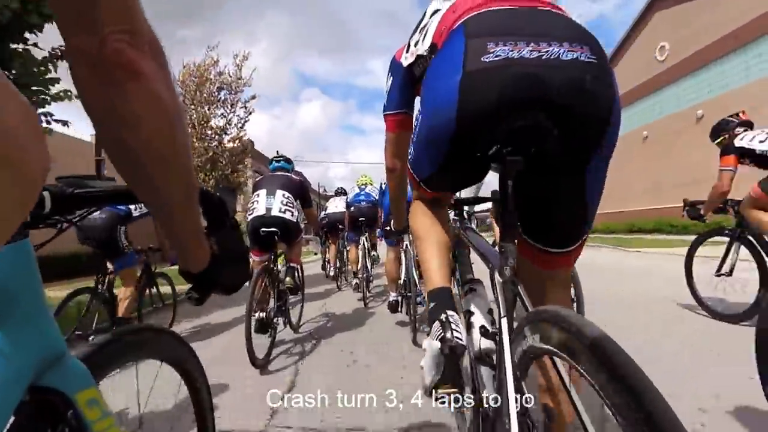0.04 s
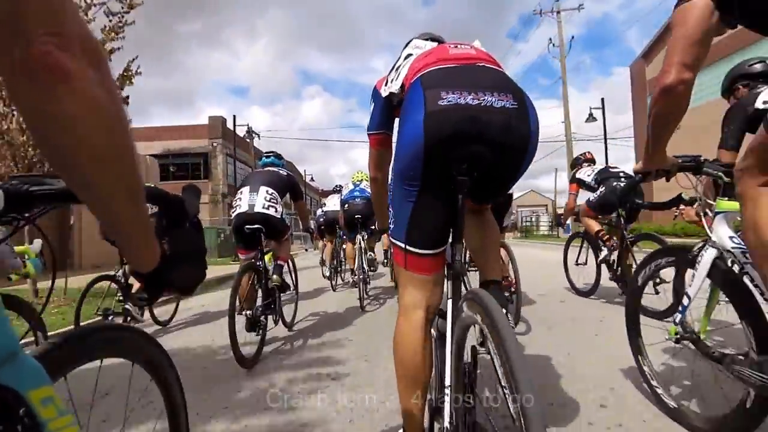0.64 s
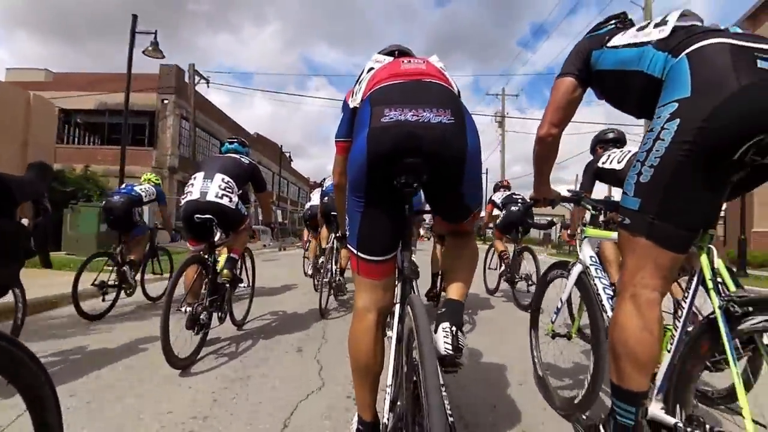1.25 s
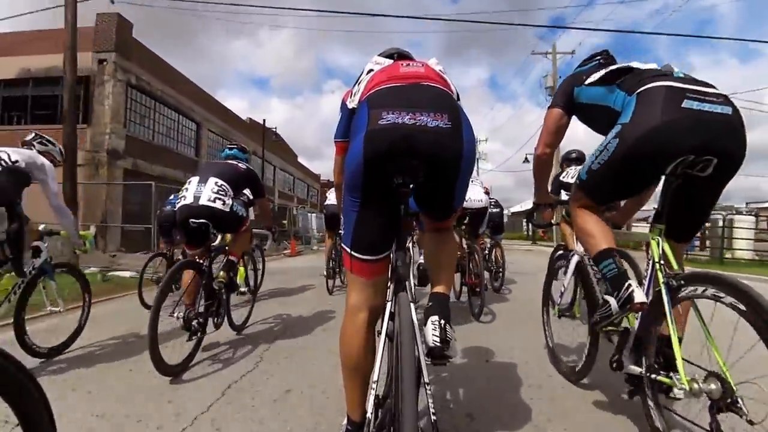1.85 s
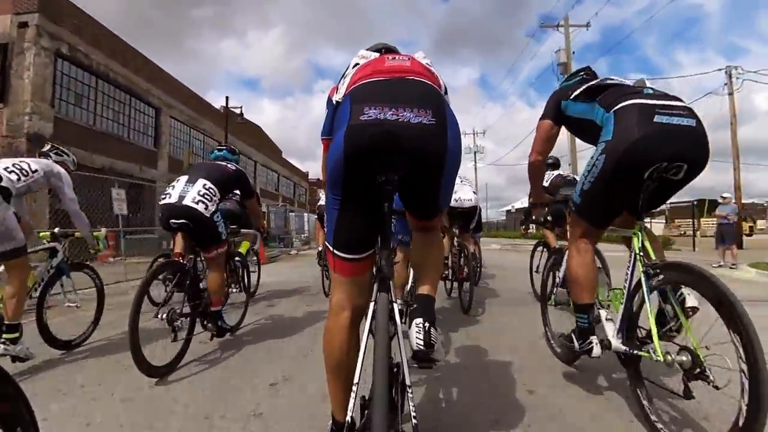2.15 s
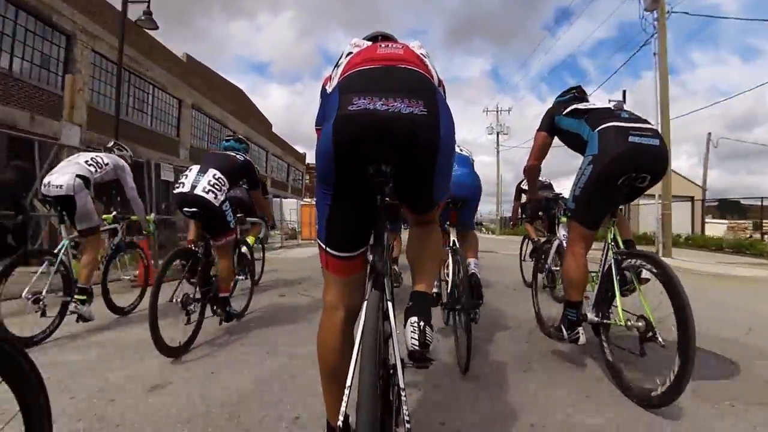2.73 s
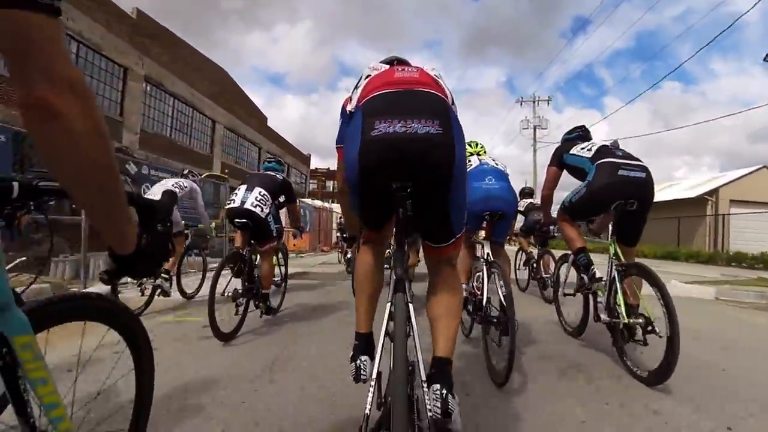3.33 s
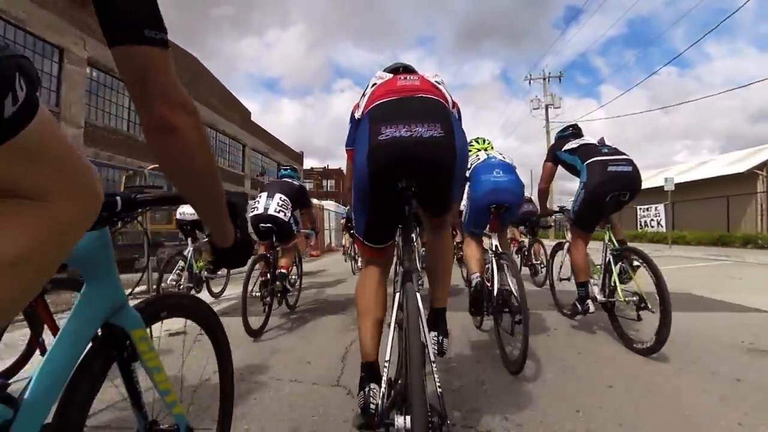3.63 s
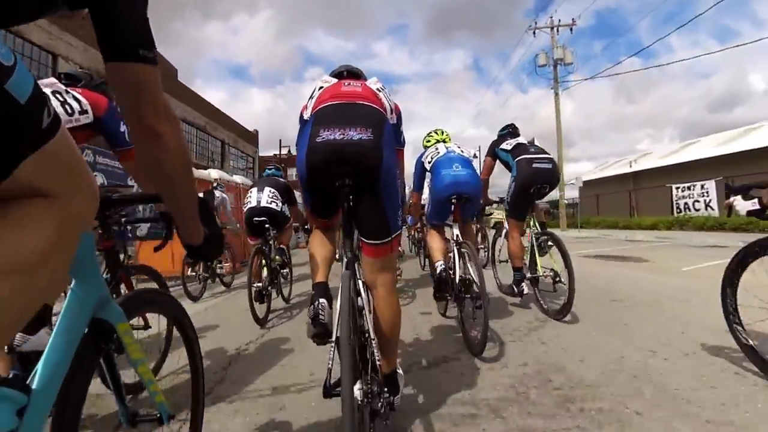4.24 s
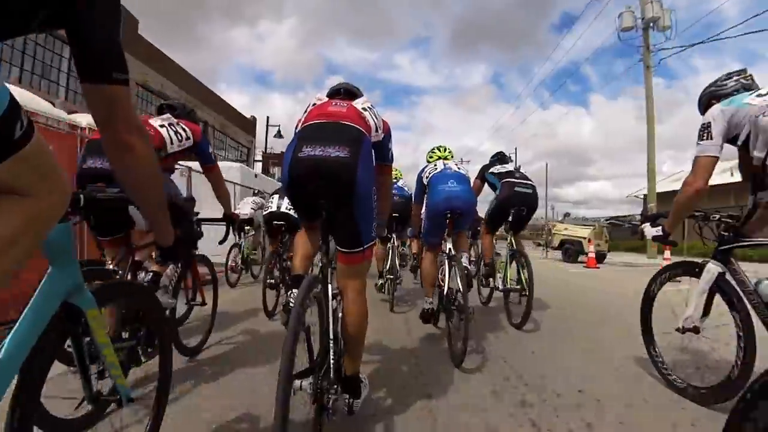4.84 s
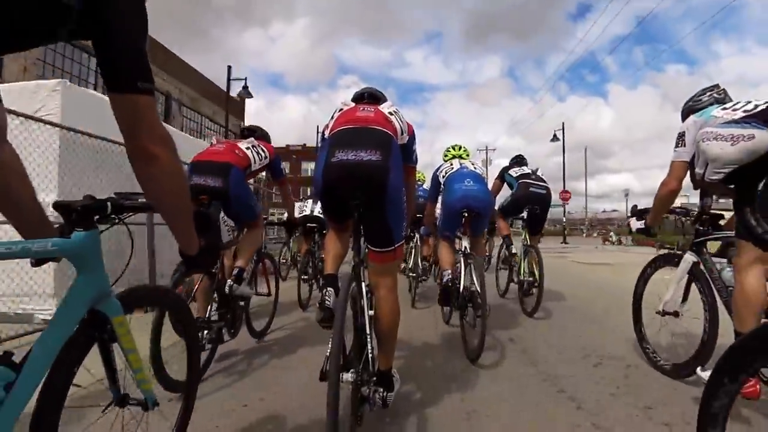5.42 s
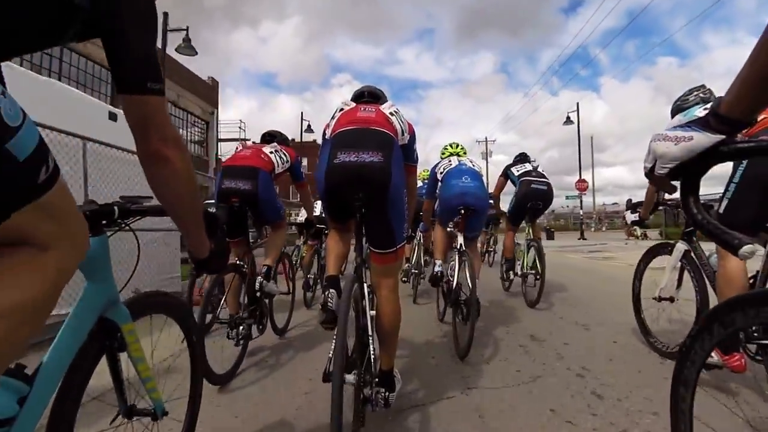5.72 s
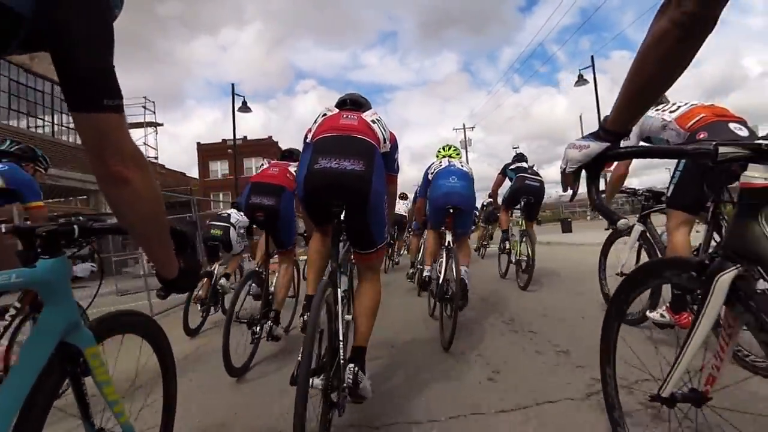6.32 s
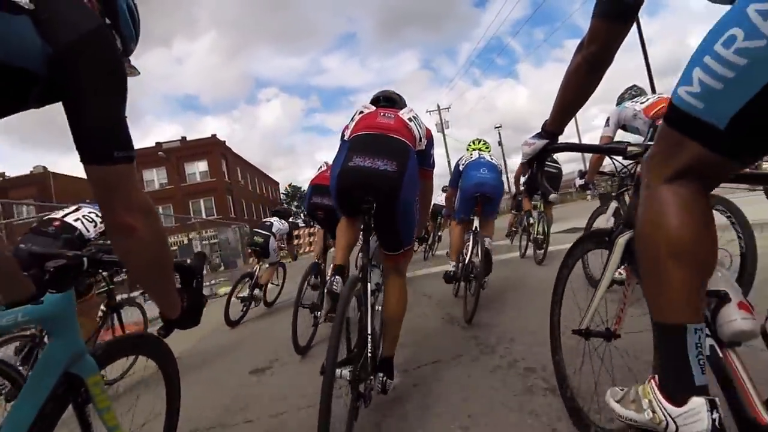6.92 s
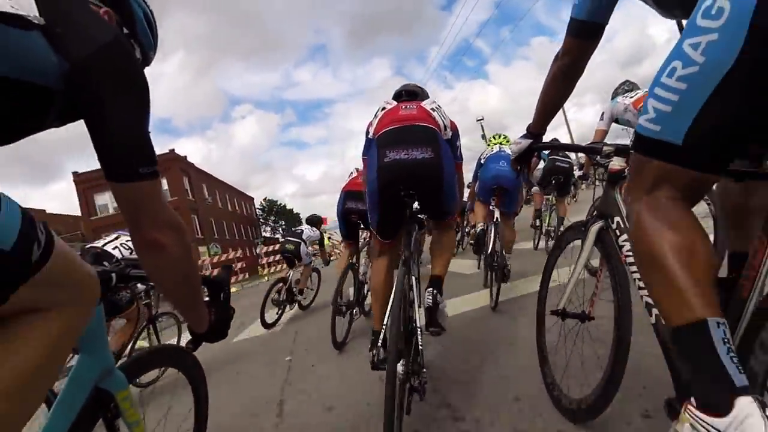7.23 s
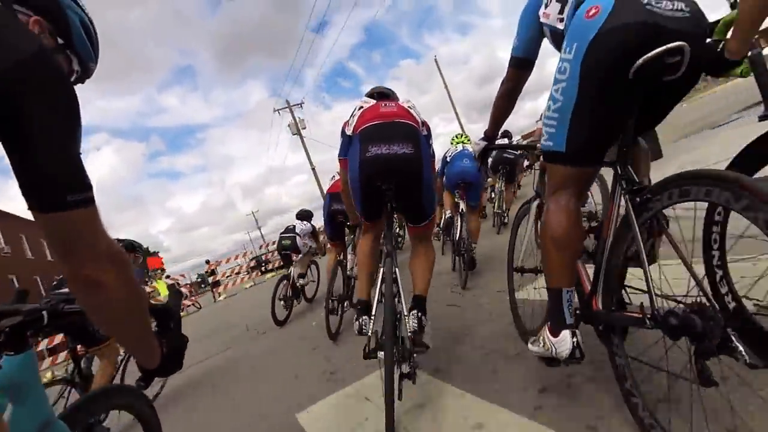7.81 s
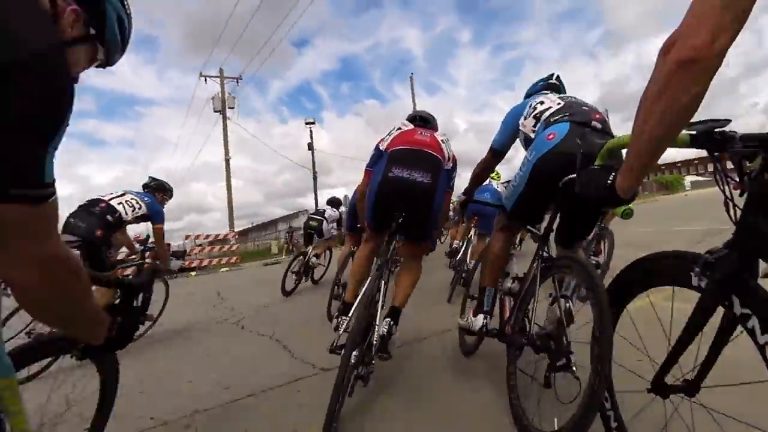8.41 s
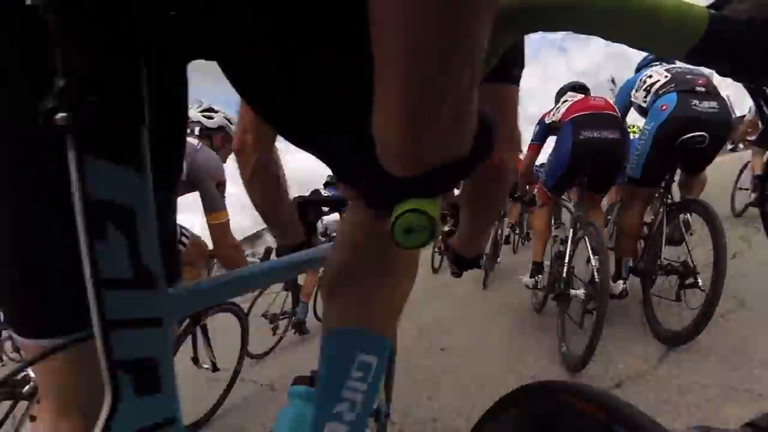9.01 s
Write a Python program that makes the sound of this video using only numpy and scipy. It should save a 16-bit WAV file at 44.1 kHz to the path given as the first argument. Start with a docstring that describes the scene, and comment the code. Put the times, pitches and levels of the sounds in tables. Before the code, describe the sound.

Racing bicycle chains whirr and gears tick under rushing wind and clattering mount knocks, until brakes briefly squeal and scrub.

```python
"""Riding in a bicycle race

A camera rides on a racing bicycle inside a pack. Wind and rough asphalt drum on its housing and mount,
while chains whirr, gears tick and loose parts rattle. Cracks in the road make the mount knock,
overloading the microphone. Near the end, in a corner, brakes squeal and scrub on the rims."""
import sys
import numpy as np
from scipy import signal
from scipy.fft import rfft, irfft, next_fast_len
from scipy.io import wavfile
from scipy.ndimage import uniform_filter1d, map_coordinates

SR = 44100
rng = np.random.default_rng(int(sys.argv[2]) if len(sys.argv) > 2 else 0)


def unload_audio(sound):
    """Save the sound as a 16-bit wav file, at the path given as the first command line argument."""
    columns = np.transpose(np.atleast_2d(sound))
    # keep every value between -1 and 1, then stretch to whole-number steps
    steps = np.round(np.clip(columns, -1, 1) * 32767)
    wavfile.write(sys.argv[1], SR, steps.astype(np.int16))


N = 399546
TIME = np.arange(N) / SR

# whirr of the whole pack's chains: t/s, level/dB
PACK_LEVELS = [(0, -53), (3.5, -45), (3.8, -50.5), (5.0, -49.5), (6.0, -47.5), (7.5, -53), (8.5, -50),
               (9.06, -48)]
# spells when a rider close by coasts and the freewheel buzzes louder: t/s, length/s, level/dB
COASTING_SPELLS = [(0, 1.31, -39), (1.655, 1.1, -40.5), (3.084, 0.11, -39), (3.257, 0.036, -37.5),
                   (6.155, 0.55, -40.5), (8.904, 0.2, -41.5)]
# resonances (favoured pitches) of chains and sprockets: f/Hz, width/Hz, level/dB
CHAIN_MODES = [(2260, 220, -6), (2658, 296, 9.5), (3264, 340, -3), (3880, 520, -11.5), (4290, 310, -14),
               (4590, 320, -11), (5450, 290, -22.5), (7270, 330, -32), (8040, 540, -36)]
# a chain brushes its guide: t/s
RUB_TIMES = [1.9, 2.1, 2.34]
# gear and spoke ticks close by: t/s, level/dB
CLOSE_TICKS = [(1.373, -16), (2.399, -15.5), (4.404, -17), (4.526, -9), (4.665, -23), (5.056, -27),
               (5.867, -25), (5.952, -25), (6.08, -20.5), (6.131, -21.5), (6.732, -27), (6.843, -23),
               (7.094, -25.5), (7.261, -15), (8.009, -18), (8.901, -16), (8.934, -18)]
# tone colour of the ticks: f/Hz, level/dB
TICK_SPECTRUM = [(500, -10), (1500, 5), (3800, 5), (5000, -16), (6500, -25.5), (9000, -42.5), (16000, -58)]
# strength of the wind, rising in the corner: t/s, level/dB
WIND_LEVELS = [(0, -32), (2.6, -33), (3.9, -35), (4.5, -32), (5.7, -34), (7.6, -34), (8.5, -32),
               (8.73, -26.5), (9.06, -29.5)]
# tone colour of the wind: f/Hz, level/dB
WIND_SPECTRUM = [(20, -28), (70, -3), (250, 2.5), (550, 3.5), (800, 2), (1150, -3.5), (1500, -6),
                 (2000, -15.5), (3700, -19), (4600, -33.5), (5100, -37), (5600, -37), (6500, -49),
                 (9000, -63.5), (16000, -74.5)]
# flurries of taps from loose parts: t/s, level/dB
TAP_FLURRIES = [(0.432, -25.5), (1.23, -16.5), (1.655, -20.5), (2.926, -17), (3.385, -16), (3.615, -16),
                (4.164, -21), (4.397, -15), (4.741, -15.5), (5.311, -19.5), (5.371, -25.5), (5.69, -22),
                (5.805, -21), (5.934, -23), (6.071, -23.5), (6.86, -26.5), (7.98, -22.5), (8.169, -15.5),
                (8.244, -22), (8.308, -18), (8.87, -19.5)]
# tone colour of the taps: f/Hz, level/dB
TAP_SPECTRUM = [(100, -9.5), (400, 20), (800, 16), (1800, -6), (3900, -4.5), (5200, -29), (9000, -47),
                (16000, -70.5)]
# light metal rattles on the bikes: t/s, level/dB
STEEL_CLINKS = [(3.058, -22), (7.99, -16), (7.9938, -23), (8.3443, -20), (8.7793, -12.5), (8.962, -23),
                (9.039, -21)]
# tones of the clinking steel: f/Hz, level/dB, t60/s (the time to fade by 60 dB)
STEEL_MODES = [(2250, -10.5, 0.025), (2725, 0.5, 0.026), (3280, -3, 0.015), (3840, -13, 0.017)]
# brake pads singing on a rim: t/s, length/s, level/dB
BRAKE_SQUEALS = [(8.211, 0.058, -36.5), (8.288, 0.071, -39), (8.401, 0.026, -35), (8.45, 0.036, -39.5),
                 (8.902, .04, -38)]
# tone colour of the rubbing pads: f/Hz, level/dB
PAD_SPECTRUM = [(300, 0), (800, 13.5), (1700, -5), (2500, 3), (3400, -7), (4700, -13), (5400, -31),
                (7800, -24), (9000, -51), (15000, -71)]
# resonances of the scrubbed rim: f/Hz, width/Hz, level/dB
RIM_MODES = [(2390, 140, 7), (2690, 86, 4.5), (3260, 100, 4), (3720, 100, 0), (4100, 140, -3),
             (4650, 150, -9)]
# resonances of the mount: f/Hz, width/Hz, level/dB
MOUNT_MODES = [(56.3, 7.1, -18.5), (130.6, 12, -2.5), (180.8, 39.5, -9)]
# resonances of the housing: f/Hz, width/Hz, level/dB
HOUSING_MODES = [(308.5, 33, -2), (385.9, 30.2, 1), (437.3, 44.7, -0.7)]
# bumps in the road: t/s, change in the mount's boom/dB, change in the housing's hollow sound/dB
ROAD_BUMPS = [(0.43, 2, 4), (0.95, 6.5, 2.5), (1.14, -5.5, 11.5), (1.231, 9, 12.5), (2.589, -6, 7),
              (2.68, 3.5, 8), (2.95, 4, -5), (3.41, -8.5, 4), (3.631, 13, 4), (4.67, 7, 5), (5.939, 6.5, 9),
              (6.08, 5.5, 0), (6.51, 7, 3), (6.87, -3.5, 8.5), (7.97, 1, 5.5), (8.56, -5, 5),
              (8.61, 2, 9.5), (8.72, -6, 8.5), (8.766, 11, 2)]
# the housing hums on after a jolt: t/s, f/Hz, level/dB, t60/s
HOUSING_HUMS = [(2.574, 357, -5, 0.1), (2.611, 390, -9.5, 0.16), (2.681, 373, -9, 0.096),
                (3.397, 417, 7, 0.05), (3.412, 434.4, -10, 0.3)]
# knocks of the mount: t/s, thump level/dB, thump rise/s, crack level/dB, clack level/dB, clack f/Hz
MOUNT_KNOCKS = [(0.5839, 1, 0.00036, -11, -12, 1140), (0.6065, -4, 0.000036, -28, -4, 790),
                (0.612, -13, 0.0004, -30, -0.5, 540), (0.6752, -4, 0.0004, -14, -9, 720),
                (1.145, 0, 0.00044, -12.5, -15.5, 480), (1.2491, -2, 0.000034, -23, -7, 666),
                (1.5776, -21, 0.0004, -19, -14, 1330), (1.682, -8.5, 0.00017, -22, -19, 800),
                (1.781, -5, 7e-05, -23, -14.5, 600), (1.7917, -7.5, 7e-05, -23.5, -22, 765),
                (2.0006, -0.5, 0.000026, -19.5, -2.5, 900), (2.013, -6, 9e-05, -13.5, -22, 510),
                (2.0333, -9, 0.0001, -41, -7, 700), (2.4394, -4, 0.00013, -15, -10, 880),
                (2.6783, -3, 7e-05, -11.5, -12, 950), (2.7095, -4, 0.0001, -30, -1, 690),
                (2.7986, -9, 0.0001, -20, -3.5, 846), (2.8029, -1.5, 0.0000086, -14, -15, 1070),
                (2.8223, -2, 5e-05, -38, -11, 480), (2.8275, -1.5, 3e-05, -22.5, -14, 980),
                (2.8364, -4, 0.000035, -28, -10, 620), (2.8478, -2, 0.000021, -18.5, -14.5, 990),
                (2.8607, -5, 0.000049, -38, 0, 480), (2.875, -10, 9e-05, -39, -9, 584),
                (2.881, -3.5, 0.000067, -38, -3, 550), (2.8909, -5, 0.000034, -21.5, -12, 740),
                (2.899, -9.5, 7e-05, -9, -8, 515), (2.9576, -7, 0.000085, -45, -7, 520),
                (3.058, -12, 0.0001, -27, -13, 835), (3.393, -15, 8e-05, -23.5, -12, 477),
                (3.402, -7.5, 0.000027, -37, -2.5, 480), (3.6264, -8.5, 0.0002, -25, -15, 790),
                (3.6409, -4.5, 0.000039, -23.5, -14, 870), (3.9158, -17, 5e-05, -37, -11.5, 480),
                (4.1473, 1, 0.0001, -29.5, -2, 750), (4.1535, 2, 0.00041, -21, -7, 960),
                (4.2042, -0.5, 0.00011, -24, -12, 820), (4.2919, 0.5, 4e-05, -32, -10, 720),
                (4.3012, 0, 0.000064, -31.5, -11, 604), (4.3068, -7, 5e-05, -26, -11, 554),
                (4.3136, -12, 5e-05, -17, -15, 890), (4.318, -5, 0.00006, -33, -11, 650),
                (4.3244, -2, 3e-05, -27, -16, 694), (4.3283, -3, 1e-05, -16.5, -11, 1080),
                (4.3483, -1, 1e-05, -15.5, -16, 1050), (4.359, -9, 0.00011, -39, -8.5, 600),
                (4.3669, -2.5, 9e-05, -27.5, -8, 680), (4.498, -4, 0.00059, -22.5, -11.5, 1300),
                (4.515, 2, 0.00011, -19, -18, 510), (4.5859, -3.5, 0.000092, -17.5, 1, 750),
                (4.7621, -3.5, 0.000092, -28, -3.5, 716), (5.282, -5, 0.0004, -24.5, -10, 700),
                (5.3105, -6, 0.00034, -20.5, -17, 574), (5.319, -10, 0.0001, -41, -3, 510),
                (5.3306, -12.5, 0.00028, -27, -21, 740), (5.5622, -5.5, 0.000022, -23.5, -17, 794),
                (5.5706, -1, 5e-05, -32.5, -2, 500), (5.5741, -2.5, 0.000042, -33, -8.5, 580),
                (5.5796, -3.5, 1e-05, -18.5, -14, 960), (5.589, -2, 0.0001, -23, -15, 890),
                (5.6002, -1.5, 0.000083, -27, -8.5, 733), (5.6654, -5, 0.00037, -12.5, -12, 620),
                (5.704, -13, 0.0001, -38, -3.5, 480), (5.7185, -15, 0.0001, -46, -5, 483),
                (6.3562, 0.5, 0.000015, -20, -1.5, 915), (6.3616, -8.5, 0.000036, -26.5, -3.5, 665),
                (7.2122, -0.5, 5e-05, -13.5, -3, 990), (7.3101, -17, 0.0002, -17, -27, 1010),
                (7.3217, -14, 0.0004, -17.5, -14, 880), (7.3448, -8, 0.00012, -30, -4.5, 670),
                (7.3734, -24, 0.0001, -17.5, -10, 800), (7.4237, -5, 0.00046, -14.5, -19, 800),
                (7.4728, -15, 0.00018, -19, -14.5, 690), (7.6486, -1, 5e-05, -10, -2.5, 870),
                (7.6645, -7.5, 0.0001, -44, -1.5, 580), (7.6795, -6.5, 0.000048, -34, -3.5, 530),
                (7.683, -7, 0.000046, -32.5, -3, 540), (7.692, -0.5, 0.000075, -22.5, -12, 800),
                (7.701, -2.5, 0.000093, -27, -13, 780), (7.8145, -1.5, 0.000033, -16.5, -26, 890),
                (8.126, -5.5, 0.00024, -27, 0, 785), (8.1388, -1.5, 3e-05, -31.5, -8, 720),
                (8.1469, -2, 4e-05, -37.5, -10, 610), (8.156, 1, 4e-05, -26, -11, 690),
                (8.1839, -2, 0.000024, -23.5, -9, 750), (8.1934, -2.5, 5e-05, -26, -14, 730),
                (8.3019, -6, 0.0004, -21.5, -7, 630), (8.3477, 0, 0.00033, -17, -12, 830),
                (8.3591, -4, 3e-05, -23.5, -16, 810), (8.3673, -0.5, 0.000078, -44, -6.5, 480),
                (8.3737, -0.5, 0.00012, -29.5, -20, 580), (8.3838, -5, 0.000059, -29, -6.5, 610),
                (8.4223, -3.5, 0.000065, -34, -2, 570), (8.4288, 1, 0.00014, -33, -18.5, 610),
                (8.6075, -9, 0.0003, -31.5, -16, 720), (8.7576, -5, 0.000036, -36, -11, 690),
                (8.7627, -1.5, 0.00024, -34, -13, 810), (8.766, -9, 0.000033, -35, -4.5, 682),
                (8.7911, -3, 4e-05, -34, -4, 590), (8.7981, -1.5, 0.000045, -33, -12, 540),
                (8.8034, -3, 0.0001, -21.5, -7, 820), (8.8067, -1, 0.00045, -9.5, -7, 1210),
                (8.847, -1.5, 0.000048, -38, -19, 1290), (8.963, -6, 0.00022, -22.5, -14, 590),
                (9.012, -9, 0.00045, -24, -12, 1030), (9.0388, -10, 0.0004, -16.5, -11, 900)]
# tones of the plastic shell, rung by every knock: f/Hz, level/dB, t60/s
SHELL_MODES = [(623, -3, 0.0076), (889, 1.5, 0.0083), (1300, 7, 0.012), (1680, -3.5, 0.0079),
               (2400, 2.5, 0.0076), (2920, 4, 0.0098), (3610, -1, 0.0075), (4700, -8.5, 0.0081)]
# how the microphone dulls a thump: f/Hz, level/dB
THUMP_SPECTRUM = [(3500, 0.5), (5500, -7), (12000, -17), (18000, -28)]
# tone colour of a knock's sharp crack: f/Hz, level/dB
CRACK_SPECTRUM = [(200, -9.5), (700, 10.5), (1300, 4.5), (2200, 8), (3700, 7), (5000, -19), (7000, -31),
                  (10000, -40), (18000, -48)]


def amp(db):
    """Turn decibels into a gain."""
    return 10 ** (np.asarray(db) / 20)


def unit(x):
    """Scale x to an average strength (rms) of 1."""
    return x / np.sqrt(np.mean(x ** 2) + 1e-20)


def curve(points):
    """Join (time, value) points with straight lines."""
    return np.interp(TIME, *np.transpose(points))


def gate(start, attack, hold, release):
    """A gain that rises from start, holds at 1 and falls."""
    return np.interp(TIME, start + np.cumsum([0, attack, hold, release]), [0, 1, 1, 0])


def spell(s, length, fade_s=0.025):
    """A gain that is fully on from time s, with a fade before and after."""
    return gate(s - fade_s, fade_s, length, fade_s)


def swell(s, width_s=0.021):
    """A brief smooth hump around time s."""
    return np.exp(-np.minimum(((TIME - s) / width_s) ** 2, 20))


def wobble(rate):
    """A smooth curve through `rate` random values a second."""
    return map_coordinates(rng.standard_normal(int(N * rate / SR) + 4), [TIME * rate])


def grit(rate, depth_db):
    """Noise whose strength flutters, like tyres over coarse stones."""
    return rng.standard_normal(N) * amp(depth_db * wobble(rate))


def filtered(x, response):
    """Weight each frequency in x by response(frequency)."""
    size = next_fast_len(N + SR // 2)
    return irfft(rfft(x, size) * response(np.fft.rfftfreq(size, 1 / SR)), size)[:N]


def coloured(x, spectrum):
    """Give x the tone colour of a spectrum table."""
    f, db = np.transpose(spectrum)
    return filtered(x, lambda hz: amp(np.interp(np.log(hz + 1), np.log(f), db)))


def resonate(x, modes):
    """Let x ring a set of resonances, added with alternating signs."""
    def response(f):
        return sum((-1) ** k * amp(db) * 1j * f * width / (hz * hz - f * f + 1j * f * width)
                   for k, (hz, width, db) in enumerate(modes))
    return filtered(x, response)


def passband(x, hz, kind, order):
    """Keep the "low" or "high" side of hz; a higher order cuts more steeply."""
    return signal.sosfilt(signal.butter(order, hz, kind, fs=SR, output="sos"), x)


def steadied(x, span_s):
    """Even out the slow swells of a vibration, leaving its fast beating."""
    power = np.abs(uniform_filter1d(x * x, int(span_s * SR) + 1))
    return unit(x / np.sqrt(power + 1e-12))


def add(track, s, sound):
    """Mix a short sound into a track at time s."""
    part = track[max(0, round(s * SR)):][:len(sound)]
    part += sound[:len(part)]


def chains():
    """Countless hits of chain links blur into a whirr that rings the steel and swells a little."""
    def steel(f):
        return sum(amp(db) / np.hypot(1, 2 * (f - hz) / width) ** 3 for hz, width, db in CHAIN_MODES)
    near = sum(amp(db) * spell(s, length) for s, length, db in COASTING_SPELLS)
    links = grit(rate=400, depth_db=2.4) * amp(2 * wobble(12))
    return np.hypot(amp(curve(PACK_LEVELS)), near) * unit(filtered(links, steel))


def chain_rub(ring_hz=4600, width_hz=300, level_db=-55):
    """Now and then a chain brushes its guide, which rings high."""
    touch = sum(spell(s, length=0.06) for s in RUB_TIMES)
    guide = [(ring_hz, width_hz, 0)]
    return amp(level_db) * touch * unit(resonate(resonate(rng.standard_normal(N), guide), guide))


def gears(per_second=14, decay_s=0.0028):
    """Gears and spokes tick on the bikes all around, a few of them close by."""
    ticks = np.zeros(N)
    t = np.arange(SR // 100) / SR
    draws = rng.random((round(per_second * N / SR), 2))
    distant = [(when * N / SR, -26 - 10 * far) for when, far in draws]
    for s, db in distant + list(CLOSE_TICKS):
        add(ticks, s, amp(db) * rng.uniform(-0.92, 1, len(t)) * np.exp(-t / decay_s))
    return coloured(ticks, TICK_SPECTRUM)


def wind():
    """Air and tyres roar, fluttering with the swirling air."""
    return amp(curve(WIND_LEVELS)) * unit(coloured(grit(rate=76, depth_db=3), WIND_SPECTRUM))


def loose_parts(strays_per_second=32, flurry_s=0.04, flurry_taps=6, decay_s=0.0016):
    """Loose parts tap in short flurries, and faintly in between."""
    taps = np.zeros(N)
    t = np.arange(SR // 100) / SR
    draws = rng.random((int(strays_per_second * N / SR), 2))
    strays = [(when * N / SR, -37 + 8 * size) for when, size in draws]
    flurries = [(s + flurry_s * (k + rng.random()) / flurry_taps, db + 2 * rng.standard_normal())
                for s, db in TAP_FLURRIES for k in range(flurry_taps)]
    for s, db in strays + flurries:
        add(taps, s, amp(db) * rng.standard_normal(len(t)) * np.exp(-t / decay_s))
    return coloured(taps, TAP_SPECTRUM)


def clinks(attack_s=0.00022):
    """Steel parts clink briefly, tuned a little differently each time."""
    out = np.zeros(N)
    t = np.arange(SR // 4) / SR
    for s, db in STEEL_CLINKS:
        detunes = rng.standard_normal(len(STEEL_MODES))
        ring = sum(amp(level - 60 * t / t60) * np.sin(2 * np.pi * hz * (1 + 0.013 * detune) * t)
                   for (hz, level, t60), detune in zip(STEEL_MODES, detunes))
        add(out, s, amp(db) * np.tanh(t / attack_s) ** 2 * ring)
    return out


def brake_squeal(start_hz=3670, sag_hz_per_s=1600):
    """A pad sticks and slips on the rim in fluttering squeals that sag in pitch."""
    waver = 1 + 0.009 * wobble(400)
    flutter_db = 4.2 * wobble(130)
    out = np.zeros(N)
    for s, length, db in BRAKE_SQUEALS:
        hz = waver * (start_hz - sag_hz_per_s * np.clip(TIME - s, 0, length))
        tone = np.sin(2 * np.pi * np.cumsum(hz) / SR)
        out += amp(db + flutter_db) * spell(s, length, fade_s=0.01) * tone
    return out


def brake_scrub(start_s=8.495, tighten_db_per_s=15, grains_per_second=900):
    """Pads bite and scrub ever harder, while grains of grit ring the rim."""
    pull = gate(start_s, attack=0.065, hold=0.27, release=0.05)
    grip = pull * amp(-34.5 + tighten_db_per_s * (TIME - start_s))
    rub = unit(coloured(grit(rate=190, depth_db=-2), PAD_SPECTRUM))
    grains = rng.standard_normal(N) * (rng.random(N) < grains_per_second / SR)
    rim = np.zeros(N)
    for hz, width, db in RIM_MODES:
        # each resonance swells and fades on its own
        ring = resonate(grains * amp(3 * wobble(35)), [(hz, width, db)])
        rim += resonate(ring, [(hz, 4 * width, 0)])
    return grip * passband(amp(-4) * rub + amp(-1.5) * unit(rim), 8400, "low", order=8)


def drumming(hard_knock_db=-4):
    """Road and wind shake a boom from the mount and a hollow sound from the housing; jolts vary both."""
    jolt = np.minimum(sum(swell(s) for s, db, *_ in MOUNT_KNOCKS if db > hard_knock_db), 1)
    road_db = 2 * wobble(14)
    boom_db = -16 + road_db + 3.5 * jolt + sum(db * swell(s) for s, db, _ in ROAD_BUMPS)
    hollow_db = -22 + road_db + 0.5 * jolt + sum(db * swell(s) for s, _, db in ROAD_BUMPS)
    boom = passband(resonate(grit(rate=90, depth_db=3.5), MOUNT_MODES), 290, "low", order=3)
    boom = passband(boom, 50, "high", order=4)
    hollow = passband(resonate(grit(rate=90, depth_db=3), HOUSING_MODES), 474, "low", order=7)
    return amp(boom_db) * steadied(boom, span_s=0.082) + amp(hollow_db) * steadied(hollow, span_s=0.067)


def housing_hum():
    """A jolt leaves the housing humming on one fading tone."""
    out = np.zeros(N)
    t = np.arange(SR // 4) / SR
    for s, hz, db, t60 in HOUSING_HUMS:
        add(out, s, amp(db - 60 * t / t60) * np.tanh(t * hz) ** 2 * np.sin(2 * np.pi * hz * t))
    return out


def smooth_step(t, rise_s):
    """A soft step from 0 to 1 around t = 0."""
    return (1 + np.tanh(t / rise_s)) / 2


def air_shove(t, rise_s, push_s, recoil_s):
    """A knock shoves the air in the housing one way, then back; a faster rise sounds sharper."""
    pushed = smooth_step(t, rise_s)
    turned = smooth_step(t - push_s, rise_s=0.00017)
    return 0.83 * (pushed - turned) - turned * np.exp(-np.maximum(t - push_s, 0) / recoil_s)


def knocks(clack_s=0.0018, crack_s=0.00018, run_up_s=0.002):
    """Each knock of the mount thumps, clacks hollowly, rings the plastic shell and cracks sharply."""
    thumps, clacks, cracks = np.zeros((3, N))
    t = np.arange(SR // 40) / SR - run_up_s
    age = np.maximum(t, 0)
    onset = smooth_step(t, rise_s=0.00008)
    for s, thump_db, rise_s, crack_db, clack_db, clack_hz in MOUNT_KNOCKS:
        size, side, *detunes = rng.standard_normal(len(SHELL_MODES) + 2)
        # a harder contact has a louder crack and a shorter push
        push_s = np.interp(crack_db, [-33.5, -11.5], [0.001614, 0.00082]) * np.exp(0.08 * size)
        recoil_s = np.interp(thump_db, [-12, -2], [0.001, 0.0017])
        shell = sum(amp(db - 60 * age / t60) * np.sin(2 * np.pi * (hz * (1 + 0.11 * detune) * t + detune))
                    for (hz, db, t60), detune in zip(SHELL_MODES, detunes))
        burst = rng.standard_normal(len(t)) * np.exp(-age / crack_s)
        clack = amp(clack_db) * onset * np.sin(2 * np.pi * clack_hz * t) * np.exp(-(t / clack_s) ** 2)
        start = s - 0.0003 - run_up_s
        add(thumps, start, np.sign(side) * amp(thump_db) * air_shove(t, rise_s, push_s, recoil_s))
        add(clacks, start, amp(crack_db - 13) * unit(onset * shell) + np.sign(side) * clack)
        add(cracks, start, amp(crack_db - 14) * unit(onset * burst))
    # the thumps also set the mount swaying at its lowest resonance
    sway = amp(2.5) * resonate(thumps, [(MOUNT_MODES[0][0], 22, 0)])
    thuds = coloured(passband(thumps + sway, 69, "high", order=2), THUMP_SPECTRUM)
    return thuds + passband(clacks, 4600, "low", order=5) + coloured(cracks, CRACK_SPECTRUM)


def overload_gain(blows):
    """A knock blocks the microphone for an instant; a run of knocks keeps it quieter a little longer."""
    def load(recovery_s):
        return passband(blows ** 2, 1 / (2 * np.pi * recovery_s), "low", order=1)
    return 1 / (1 + 6 * load(0.0016) + 9 * load(0.062) + 2 * load(0.054))


def scene():
    """Everything reaches one microphone; the riding noise dips under the knocks."""
    riding = drumming() + wind() + chains() + chain_rub() + loose_parts()
    riding += brake_squeal() + brake_scrub() + gears()
    ringing = clinks() + housing_hum()
    blows = knocks()
    return (overload_gain(blows) * riding + blows + ringing)[None]


def record(dry):
    """Round off the loudest peaks, cut the highest treble and fade both ends to avoid a click."""
    limited = dry[0] / (1 + np.abs(dry[0]) ** 8) ** (1 / 8)
    fades = np.clip(np.minimum(TIME, TIME[-1] - TIME) / 0.003, 0, 1)
    return (fades * passband(limited, 19300, "low", order=12))[None]


dry = scene()
out = record(dry)
unload_audio(out)
```